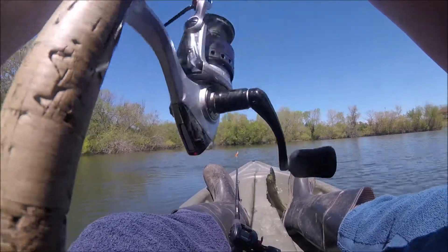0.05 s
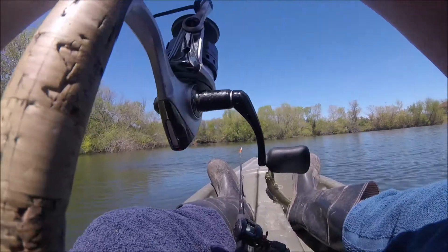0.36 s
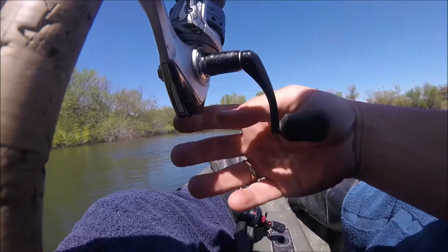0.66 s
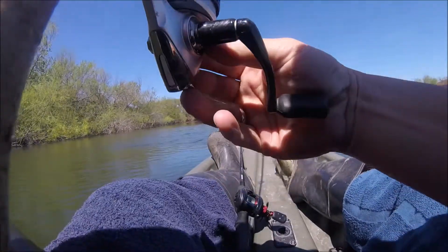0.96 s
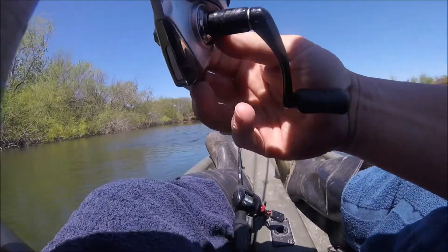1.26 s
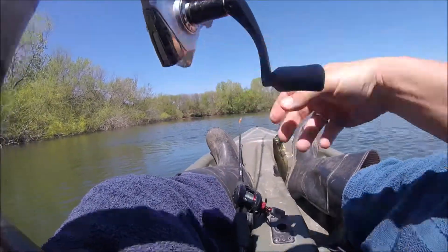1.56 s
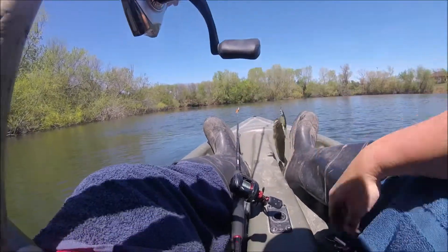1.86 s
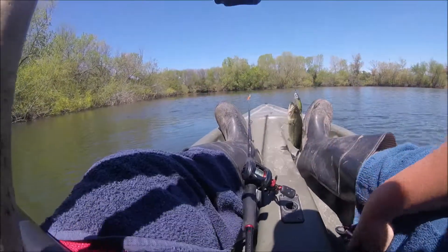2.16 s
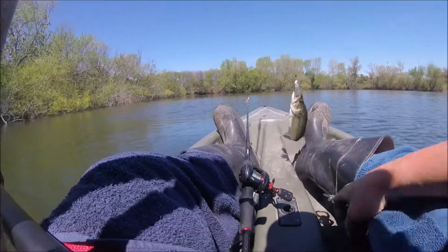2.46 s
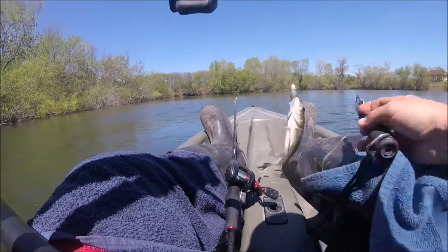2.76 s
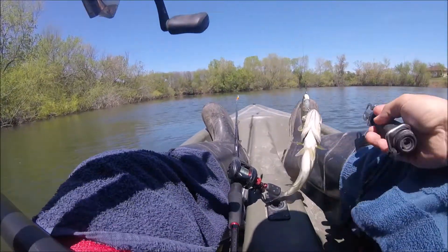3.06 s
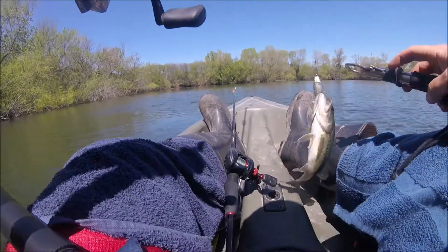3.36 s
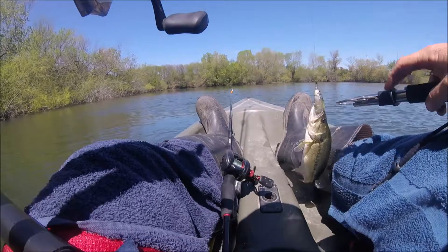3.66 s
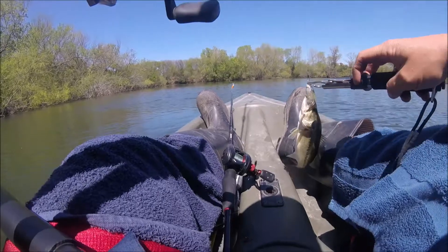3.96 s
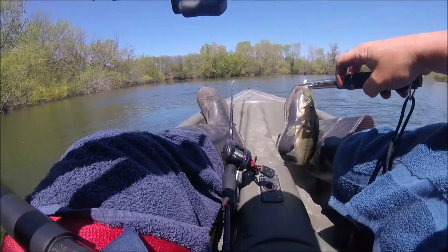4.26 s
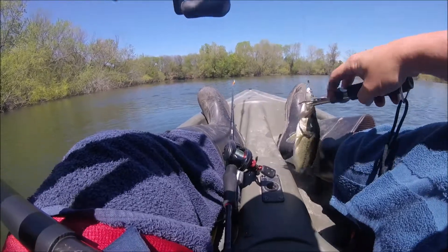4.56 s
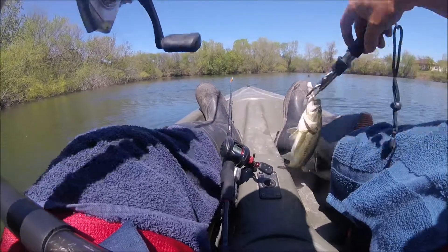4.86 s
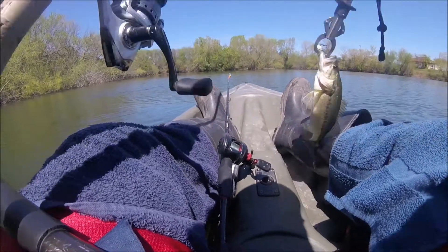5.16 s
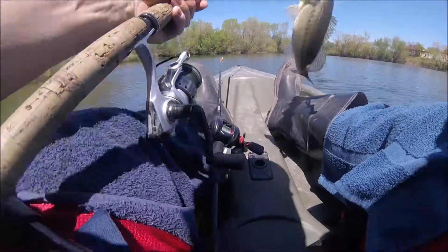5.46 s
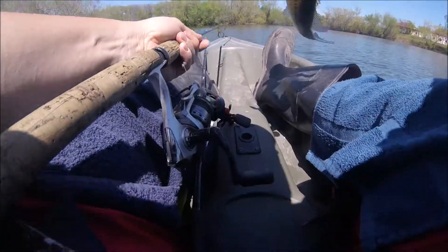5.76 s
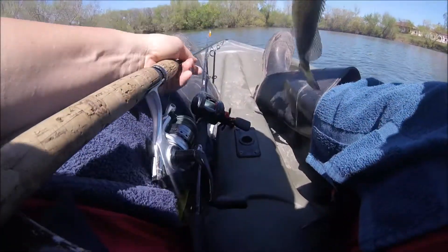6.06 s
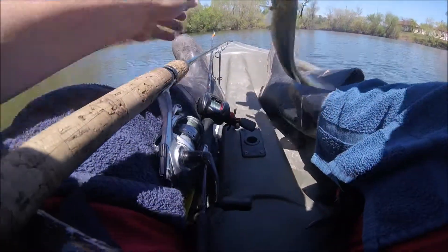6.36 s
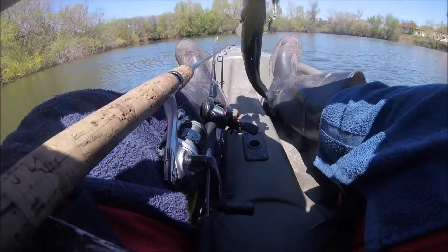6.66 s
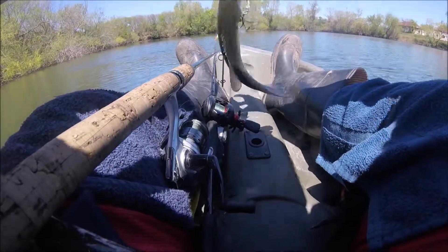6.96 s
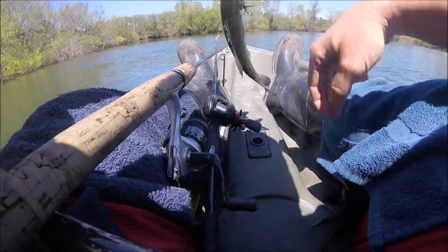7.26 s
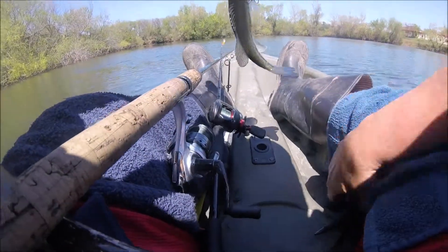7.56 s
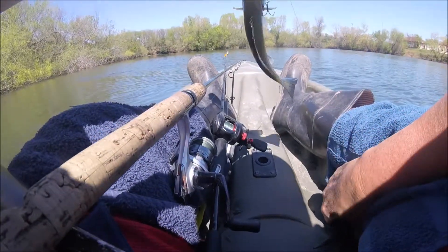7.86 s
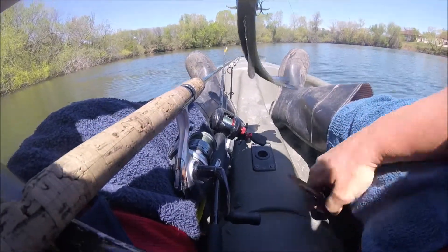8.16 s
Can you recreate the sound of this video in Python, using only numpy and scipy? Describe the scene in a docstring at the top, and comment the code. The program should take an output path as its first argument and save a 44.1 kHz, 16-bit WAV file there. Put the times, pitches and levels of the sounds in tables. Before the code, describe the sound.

Close by on an open lake, a fishing reel clicks softly and its wire bail snaps over. Metal pliers scrape and knock against a hollow plastic kayak, with one very loud bang. The pliers tick lightly on a hook, a rod is laid down with a few rattling bounces, and another hard knock comes as the pliers are put back. A low rumble, a distant motor hum and very faint birds lie underneath.

```python
"""Fishing from a plastic kayak

On a lake, fingers click a spinning reel and its bail (the wire that guides the line) snaps over.
Pliers are dug out, knock the hollow hull and grip a hook; the rod is laid down with a few bounces,
and the pliers are put back. A low rumble, a distant motor and faint birds lie underneath.
A body camera's limiter turns everything down after the hardest hits."""
import sys
import numpy as np
from scipy import signal
from scipy.fft import rfft, irfft
from scipy.io import wavfile
from scipy.ndimage import uniform_filter1d, minimum_filter1d

SR = 44100
rng = np.random.default_rng(int(sys.argv[2]) if len(sys.argv) > 2 else 0)


def log_audio(samples):
    """Write samples as a 16-bit WAV file to the path given in sys.argv[1]."""
    # one column per channel
    frames = np.atleast_2d(samples).T
    # limit to full scale, then quantise
    limited = np.clip(frames, -1, 1)
    pcm = np.round(limited * 32767).astype(np.int16)
    wavfile.write(sys.argv[1], SR, pcm)


N = 371322
TIME = np.arange(N) / SR
AGE = TIME[:SR // 2]  # seconds since a hit

# The tones of the reel's housing: pitch_hz, level_db, fade_s (time to die away by 60 dB)
HOUSING_TONES = [(1570, 4.5, 0.072), (1800, -6, 0.045), (2926, 0, .045), (3400, -1.5, 0.04),
                 (3980, -2, 0.028), (4500, -4.5, 0.049), (5770, -9, 0.015), (6670, -8.5, 0.055)]
# How strong rattling fittings are from low to high: pitch_hz, level_db
RATTLE_SPECTRUM = [(200, -17), (600, 3.5), (1100, -2.5), (1600, 5.5), (2300, -3.5), (3200, -3.5),
                   (4300, -12), (7000, -24), (9000, -29.5), (14000, -43.5)]


def hull_knocks():
    """A knock bends the wall in and out once; the struck panel cracks and the hollow hull rings on."""
    # Blows, each with its own pitch; crack and hollow count from the blow's level: # start_s, level_db,
    # pitch_hz, crack_db, crack_hz, hollow_db
    knocks = [(2.118, -23.5, 138, -14.5, 1210, -26), (2.298, -24, 222, -15, 1480, -26),
              (2.456, -13.5, 185, -8, 800, -19), (2.4755, -12, 201, -4, 716, -24),
              (2.486, -24, 190, -22, 700, -30), (2.636, -16, 277, -13, 860, -26),
              (2.722, -22.5, 142, -35, 600, -41), (2.8218, 16, 300, -11.5, 823, -28),
              (2.8356, -3, 340, -22, 700, -30), (2.8528, 2.5, 365, -15, 740, -26),
              (2.873, -18, 420, -4, 1000, -15), (3.454, -23, 436, -12, 880, -24),
              (4.9748, -20.5, 396, -5, 900, -32), (5.724, -20, 160, -22, 686, -29),
              (5.737, -22.5, 221, -23, 900, -28), (7.7582, -17.5, 397, -7.5, 1220, -33),
              (7.862, -19.5, 382, -24, 620, -35), (7.9404, -3, 292, -22.5, 900, -42),
              (7.980, -22, 325, -35, 600, -40), (8.012, -22.5, 300, -36, 600, -40),
              (8.380, -23.5, 480, -9.5, 1300, -29)]
    # The hull's low tones: pitch_hz, level_db, fade_s
    hull_tones = [(97.4, 3.5, 0.073), (132.8, -4.5, 0.4), (192.5, -2, 0.24), (239.2, -8, 0.32),
                  (268.8, -4.5, 0.29), (313.5, -2, 0.18), (365.6, 1.5, 0.15), (440, -7.5, 0.2),
                  (571, -11, 0.088), (660, -4.5, 0.064)]
    # The crowd of higher tones that makes the hull sound hollow: pitch_hz, level_db
    hollow_spectrum = [(300, -25), (470, -2), (580, -5.5), (700, 3), (780, -4), (880, 0.5), (1020, -10),
                       (1250, -19), (3000, -29.5), (6500, -39), (9000, -61)]
    # The noise of the panel's crack: pitch_hz, level_db
    crack_spectrum = [(200, -18.5), (500, 7.5), (900, 10), (1400, -0.5), (2000, -7.5), (2800, -10),
                      (3700, -11.5), (5000, -19.5), (6500, -15.5), (9000, -34), (14000, -43)]
    bend_cycles, bend_lead_s = 0.58, 0.02
    crack_lead_s = 0.0018  # the crack comes at first touch, before the bend peaks
    out = np.zeros(N)
    for start_s, db, hz, crack_db, crack_hz, hollow_db in knocks:
        cycles = (AGE - bend_lead_s) * hz
        bend = np.cos(2 * np.pi * cycles) - np.exp(-(np.pi * bend_cycles) ** 2)  # as far out as in
        add(out, start_s - bend_lead_s, gain(db) * bend * np.exp(-(cycles / bend_cycles) ** 2))
        ring_db = -14.5 - 5.5 * np.log2(hz / 290)  # softer contacts ring the hull more
        add(out, start_s, hit_level(ring(hull_tones) * rise(0.0024), db + ring_db))
        add(out, start_s, hit_level(colour(burst(0.24), hollow_spectrum), db + hollow_db))
        panel = np.sin(2 * np.pi * crack_hz * AGE) * fade(0.016)
        crack = colour(burst(0.017) + gain(-28.5) * burst(0.16), crack_spectrum)
        add(out, start_s - crack_lead_s, hit_level(panel, db + crack_db - 11))
        add(out, start_s - crack_lead_s, hit_level(crack, db + crack_db - 10))
    return out


def bail_snap():
    """The sprung wire slams onto its stop, rings and bounces once; the housing takes the jolt."""
    # The wire's tones: pitch_hz, level_db, fade_s
    wire_tones = [(1900, -15.5, 0.013), (2320, -14, .008), (3140, -18, 0.016), (4200, 2, 0.0074),
                  (5055, -6, 0.0088), (5710, 1.5, 0.0065), (6930, 4.5, 0.0054), (7700, -6, 0.0067),
                  (8860, 0, 0.0053), (10740, 0, 0.0047), (12100, -12.5, 0.0074)]
    snap_s, snap_db, bounce_delay_s = 1.4117, -11.5, 0.0045
    out = np.zeros(N)
    wire = sum(gain(db) * fade(fade_s) * np.sin(2 * np.pi * hz * AGE + rng.uniform(0, 2 * np.pi))
               for hz, db, fade_s in wire_tones)
    add(out, snap_s, hit_level(wire * rise(0.00039), snap_db))
    add(out, snap_s, hit_level(colour(burst(0.0044), RATTLE_SPECTRUM), -34))
    add(out, snap_s + bounce_delay_s, hit_level(wire, snap_db - 17.5))
    add(out, snap_s, hit_level(ring(HOUSING_TONES), -37))
    return out


def rod_bounces():
    """Each bounce rattles the fittings and rings the shaft; what the rod lands on thuds just after."""
    # The rod bouncing to rest; thud and clink count from the bounce's level:
    # start_s, level_db, thud_db, rattle_fade_s, clink_db
    bounces = [(5.998, -33.5, -8, 0.025, 0), (6.001, -27, 8, 0.037, -1), (6.1435, -31, 10, 0.048, -21),
               (6.160, -40.5, 15.5, 0.17, -22), (6.2441, -37, 1, 0.061, -12), (6.321, -54, 12, .05, -19),
               (6.3877, -47, 0, 0.045, -21), (6.8946, -46.5, 2.5, 0.036, -15)]
    # The shaft's tones: pitch_hz, level_db, fade_s
    shaft_tones = [(1360, 8, 0.047), (1570, 6, 0.06), (2056, 0.5, 0.061), (2690, 7, 0.03), (3970, 8, 0.027),
                   (4660, -9, 0.02), (6400, -4, 0.025)]
    # The low tones of the thud: pitch_hz, level_db, fade_s
    thud_tones = [(150.4, -9, 0.16), (199, -7, 0.13), (277, 1.5, 0.11), (380, 2.5, 0.056), (478, 2, 0.092),
                  (590, -7, 0.09), (750, -10, 0.043), (927, -8, 0.057)]
    thud_delay_s = 0.00296
    out = np.zeros(N)
    for start_s, db, thud_db, rattle_fade_s, clink_db in bounces:
        rattle = colour(burst(rattle_fade_s) + gain(-24) * burst(0.24), RATTLE_SPECTRUM)
        add(out, start_s, hit_level(rattle, db + 0.5))
        add(out, start_s, hit_level(ring(shaft_tones), db - 2.5))
        add(out, start_s, hit_level(steel_click(fade_s=0.013, hz=4770, spread=1.47), db + clink_db))
        add(out, start_s + thud_delay_s, hit_level(ring(thud_tones) * rise(0.0034), db + thud_db))
    return out


def reel_clicks():
    """Loose parts chatter in the reel's housing under the fingers; the touched part pings."""
    # Clicks, mostly in press-and-release pairs: start_s, level_db, ping_hz
    clicks = [(0.056, -40.5, 3050), (0.0647, -40, 4060), (0.115, -49, 3040), (.131, -53, 4400),
              (0.236, -50, 4840), (0.249, -40.5, 3650), (0.479, -46, 5300), (0.495, -46.5, 5860),
              (0.873, -51, 3030), (1.126, -55, 4400), (1.392, -50, 4200), (1.423, -46, 4300),
              (1.464, -47.5, 3550), (5.972, -48, 4700), (5.981, -38.5, 5500)]
    # The noise of the loose parts: pitch_hz, level_db
    chatter_spectrum = [(600, -23.5), (1200, -13), (1650, 9.5), (2300, -8), (3200, -0.5), (4500, -4.5),
                        (6700, -6.5), (9000, -16.5), (14000, -40)]
    out = np.zeros(N)
    for start_s, db, ping_hz in clicks:
        chatter = colour(burst(0.0063) + gain(-22) * burst(0.15), chatter_spectrum)
        ping = np.sin(2 * np.pi * ping_hz * AGE) * fade(0.035)
        housing = ring(HOUSING_TONES, detune=0.022)
        click = hit_level(chatter, db - 1.5) + hit_level(ping, db - 7) + hit_level(housing, db - 3)
        add(out, start_s - 0.001, click)
    return out


def pliers_and_tackle():
    """Steel held in the hand ticks and rings briefly; small loose metal jingles higher and longer."""
    # Pliers, hook and tackle: start_s, level_db, pitch_hz, ring_db (counted from the tick's level)
    ticks = [(2.297, -54.5, 3770, -4), (2.436, -43, 2450, -8), (2.453, -35.5, 3260, -2),
             (2.4727, -45, 3750, -5), (2.635, -48, 3850, -8), (2.649, -51, 4000, -8),
             (2.657, -52, 4600, -10), (2.668, -51, 3000, -8), (2.8205, -27.5, 3000, -6),
             (2.843, -40, 3400, 1), (2.872, -36, 2720, -4), (2.947, -56, 3100, -4), (2.959, -53, 4740, -10),
             (3.16, -54, 4000, -8), (3.312, -55, 4280, -8), (3.47, -46, 3530, -12), (3.926, -57, 3500, -12),
             (3.961, -52, 3000, -6), (3.999, -44, 3580, -13), (4.032, -45, 3970, -8),
             (4.046, -51, 5230, -2), (4.055, -49.5, 3880, -4), (4.572, -47.5, 3220, -16),
             (4.574, -49, 6330, 4), (4.624, -51, 4030, -7), (4.645, -41.5, 3150, -16),
             (4.667, -47, 3700, -8), (4.688, -50, 3000, -11), (4.701, -56, 3500, -8),
             (4.724, -47.5, 5470, -2), (4.754, -58, 3800, -10), (5.051, -56, 3000, -10),
             (5.094, -57, 4400, -8), (5.177, -62, 5000, -8), (6.367, -58, 4400, -5), (6.457, -65, 2700, 7),
             (6.666, -61, 2800, -3), (6.772, -62, 3550, 2), (7.756, -45.5, 3630, 1.5),
             (7.943, -54, 2060, 0), (8.378, -65, 3540, 1)]
    # Loose bits of metal: start_s, level_db
    jingles = [(2.484, -37.5), (2.514, -45), (2.520, -41), (2.6833, -44), (5.051, -52.5), (5.0757, -51)]
    out = np.zeros(N)
    for start_s, db, hz, ring_db in ticks:
        add(out, start_s, hit_level(steel_click(fade_s=0.015, hz=hz, spread=1.85), db))
        add(out, start_s, hit_level(band(burst(0.015), hz, spread=1.076), db + ring_db))
    for start_s, db in jingles:
        add(out, start_s, hit_level(band(burst(0.044), hz=6980, spread=1.24), db))
    return out


def steel_click(fade_s, hz, spread):
    """Tapped steel gives a short, bright burst of noise."""
    # How strong the steel is from low to high: pitch_hz, level_db
    steel_spectrum = [(500, -8), (1500, 2.5), (6500, -1.5), (7500, -7), (10000, -16), (14000, -30)]
    return colour(band(burst(fade_s), hz, spread), steel_spectrum)


def swishes_and_scrapes():
    """Soft hisses swell and fade, plastic rasps with a gritty top, and the hull gives a low shudder."""
    # A faint, brief swell of hiss at 1.902 s and a short, soft hiss around the pliers' ticks at 4.644 s;
    # the rest are hands and pliers brushing cloth: start_s, length_s, level_db
    swishes = [(0.014, 0.34, -62.5), (1.499, 0.24, -59), (1.902, 0.1, -62), (2.53, 0.16, -58),
               (3.102, 0.28, -62), (3.93, 0.21, -56), (4.644, 0.066, -53), (4.718, 0.64, -63.5)]
    # Pliers and rod on plastic: start_s, length_s, level_db, grit_db (counted from the scrape's level)
    scrapes = [(2.413, 0.076, -35.5, -8.5), (2.526, 0.086, -41, -13), (2.586, 0.081, -39.5, -6),
               (2.64, 0.052, -53.5, -2), (5.711, 0.05, -48.5, -13)]
    # The hull shaking as the pliers drag after hard blows: start_s, length_s, level_db, pitch_hz
    shudders = [(2.456, 0.065, -34, 228), (2.70, .06, -33, 150), (2.825, 0.1, -23, 290),
                (2.93, 0.11, -28, 114), (7.935, 0.15, -28.5, 275)]
    out = np.zeros(N)
    for start_s, length_s, db in swishes:
        add(out, start_s, noise_swell(length_s, db, hz=3420, spread=1.94))
    for start_s, length_s, db, grit_db in scrapes:
        rasp = noise_swell(length_s, db, hz=680, spread=1.36)
        grit = noise_swell(length_s, db + grit_db, hz=1600, spread=1.65, grains_per_s=2500, scatter_db=3)
        add(out, start_s, rasp + grit)
    for start_s, length_s, db, hz in shudders:
        add(out, start_s, noise_swell(length_s, db, hz, spread=1.42))
    return out


def noise_swell(length_s, db, hz, spread, grains_per_s=5000, scatter_db=1.6):
    """Many tiny clicks of uneven size blend into a noise that swells and fades."""
    grains = (rng.random(SR) < grains_per_s / SR) * rng.standard_normal(SR)
    grains *= gain(scatter_db * rng.exponential(size=SR))
    swell = np.hanning(int(length_s * SR))
    return level(band(grains, hz, spread)[:len(swell)], db) * swell


def stray_ticks():
    """The line, its guides and clothing tick faintly at random moments."""
    out = np.zeros(N)
    for when, size, pitch in rng.random((20, 3)):
        tick = band(burst(0.018), hz=2600 + 1600 * pitch, spread=1.8)
        add(out, when * TIME[-1], hit_level(tick, -67 + 6 * size))
    return out


def birds():
    """Wavering whistles from the bank hold their pitch and then fall, blurred by the trees."""
    # Far chirps: start_s, length_s, level_db
    chirps = [(1.262, 0.078, -66), (5.278, 0.065, -66), (5.63, 0.092, -61), (6.835, 0.06, -67),
              (7.257, 0.045, -77), (8.205, 0.035, -65)]
    start_hz, hold_s, fall_hz_per_s = 4145, 0.03, 17000
    out = np.zeros(N)
    for start_s, length_s, db in chirps:
        n = int(length_s * SR)
        hz = start_hz - fall_hz_per_s * np.maximum(AGE[:n] - hold_s, 0)
        hz *= 1 + 0.019 * wander(203)[:n]
        swell = np.sqrt(np.hanning(n)) * gain(3 * wander(90)[:n])
        whistle = np.sin(2 * np.pi * np.cumsum(hz) / SR) * swell
        echoes = burst(0.07)
        add(out, start_s, gain(db) * signal.fftconvolve(whistle, echoes / np.linalg.norm(echoes)))
    return out


def lake_rumble():
    """The open air rumbles, wavering a little and easing once."""
    # The air over the lake: pitch_hz, level_db
    air_spectrum = [(20, -0.5), (60, 0.5), (100, -2.5), (150, -12.5), (215, -9), (290, -15), (355, -15.5),
                    (450, -20.5), (660, -30), (860, -30.5), (1280, -36), (3300, -45), (5000, -55)]
    air = colour(rng.standard_normal(N), air_spectrum + [(9000, -82.5)])
    lull_s, lull_width_s = 4.75, 0.83
    lull_db = -1.5 * np.exp(-((TIME - lull_s) / lull_width_s) ** 2)
    return level(air, -36.5) * gain(lull_db + 0.26 * wander(3) + 0.6 * wander(11))


def distant_motor():
    """A far motor hums, growing louder as it slowly draws nearer."""
    hz = 118.3 * (1 + 0.0037 * wander(4))
    phase = 2 * np.pi * np.cumsum(hz) / SR
    hum = np.sin(phase) + gain(-13.5 + 3.05 * wander(8)) * np.sin(3 * phase)
    approach_db = -5 * np.exp(-TIME / 3)
    return level(hum * gain(approach_db + 0.92 * wander(6.2)), -47)


def microphone_hiss():
    """The microphone adds a faint, steady hiss."""
    # The hiss from low to high: pitch_hz, level_db
    hiss_spectrum = [(3000, -33.5), (5000, -13.5), (6000, -11), (6450, 2.5), (7100, -5.5), (8000, -7),
                     (9500, -11.5), (10400, -18.5), (11500, -14.5), (13000, -17), (14000, -31)]
    return level(colour(rng.standard_normal(N), hiss_spectrum), -63.5)


def gain(db):
    """Turn decibels into a number to multiply by."""
    return 10 ** (np.asarray(db) / 20)


def level(x, db):
    """Set the average (rms) level of a steady sound."""
    return x * gain(db) / np.std(x)


def hit_level(x, db):
    """Set a hit's level as if all its energy came within five milliseconds."""
    return x * gain(db) / np.sqrt(np.sum(x ** 2) / (0.005 * SR))


def add(track, start_s, x):
    """Mix a sound into a track at the given time."""
    i = int(start_s * SR)
    track[i:i + len(x)] += x[:N - i]


def rise(rise_s):
    """Build up from silence towards full strength."""
    return 1 - np.exp(-AGE / rise_s)


def fade(fade_s):
    """Die away by 60 dB in fade_s seconds."""
    return np.exp(-np.log(1000) * AGE / fade_s)


def burst(fade_s):
    """Many tiny contacts make a noise that builds quickly and dies away."""
    return rng.standard_normal(len(AGE)) * fade(fade_s) * rise(0.001)


def ring(tones, detune=0.024):
    """A struck object's fading tones, a little different in pitch and strength at each blow."""
    out = np.zeros(len(AGE))
    for hz, db, fade_s in tones:
        strength = rng.choice([-1, 1]) * gain(db + rng.normal(0, 1.5))
        out += strength * fade(fade_s) * np.sin(2 * np.pi * hz * rng.normal(1, detune) * AGE)
    return out


def colour(x, spectrum):
    """Filter a sound to follow a curve of (pitch_hz, level_db) points."""
    size = 8192
    hz, db = np.transpose(spectrum)
    grid_hz = np.maximum(np.arange(size // 2 + 1) * SR / size, 1)
    curve = gain(np.interp(np.log(grid_hz), np.log(hz), db))
    cepstrum = irfft(np.log(curve))
    cepstrum[1:size // 2] *= 2  # fold it so that nothing sounds before the hit
    cepstrum[size // 2 + 1:] = 0
    response = irfft(np.exp(rfft(cepstrum)))
    return signal.fftconvolve(x, response)[:len(x)]


def band(x, hz, spread):
    """Keep the pitches from hz / spread to hz * spread."""
    edges_hz = [hz / spread, hz * spread]
    return signal.sosfilt(signal.butter(3, edges_hz, "band", fs=SR, output="sos"), x)


def wander(steps_per_s):
    """A smooth random drift, about 1 in size."""
    width = int(SR / steps_per_s)
    steps = np.repeat(rng.standard_normal(N // width + 1), width)
    smooth = uniform_filter1d(uniform_filter1d(steps, width), width)
    return level(smooth[:N], 0)


def limiter(x, ceiling_db, treble_weight, release_s):
    """Look ahead for peaks, most keenly in the treble, turn down at once and recover slowly."""
    ahead = int(0.045 * SR)
    peak = np.abs(x + treble_weight * np.diff(x, prepend=0))
    coming_peak = -minimum_filter1d(-peak, ahead, origin=-(ahead // 2))
    over_db = np.maximum(20 * np.log10(coming_peak) - ceiling_db, 0)
    recovery = np.exp(-TIME / release_s)
    cut_db = np.maximum.accumulate(over_db / recovery) * recovery
    return x * gain(-uniform_filter1d(cut_db, size=200))


def scene():
    """Mix the sounds within arm's reach with the background, in mono, with no walls to echo."""
    hits = hull_knocks() + rod_bounces() + reel_clicks() + bail_snap() + pliers_and_tackle()
    small_sounds = swishes_and_scrapes() + stray_ticks()
    background = birds() + lake_rumble() + distant_motor() + microphone_hiss()
    return (hits + small_sounds + background)[None]


def record(dry):
    """The camera holds down the peaks and cuts the highest treble."""
    top_hz = 14000
    limited = limiter(dry[0], ceiling_db=-1.0, treble_weight=0.41, release_s=1.0)
    return signal.sosfilt(signal.ellip(8, 0.2, 70, top_hz, fs=SR, output="sos"), limited)[None]


dry = scene()
out = record(dry)
log_audio(out)
```